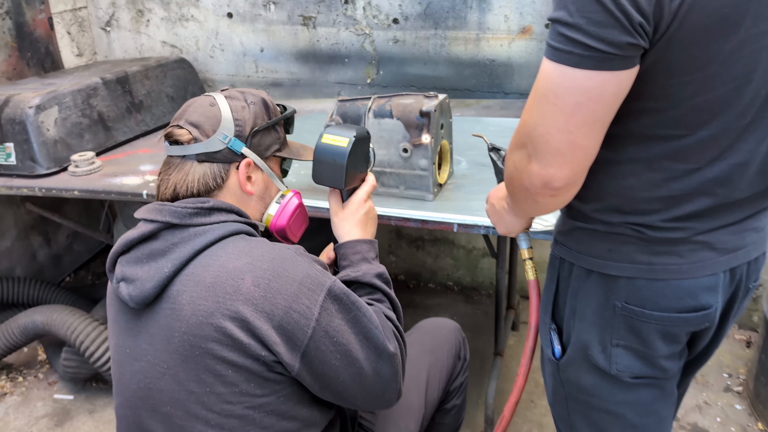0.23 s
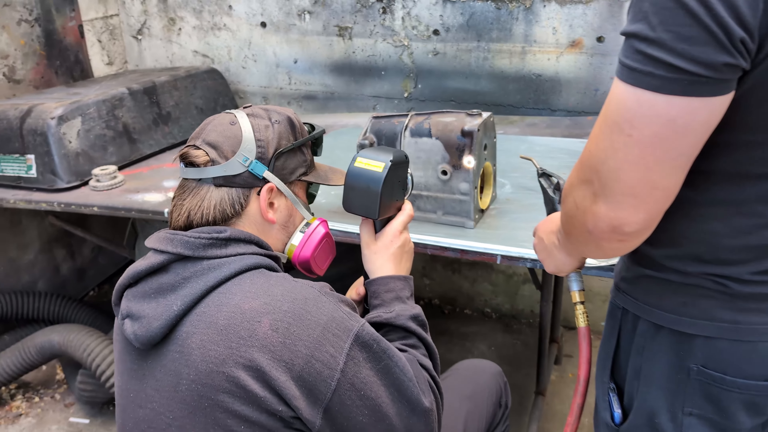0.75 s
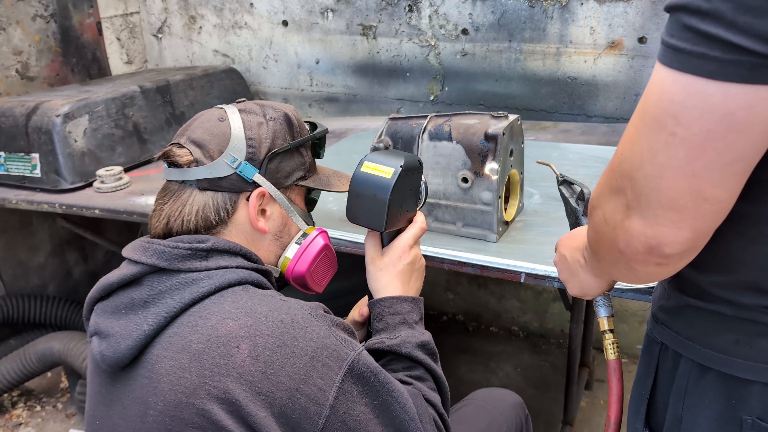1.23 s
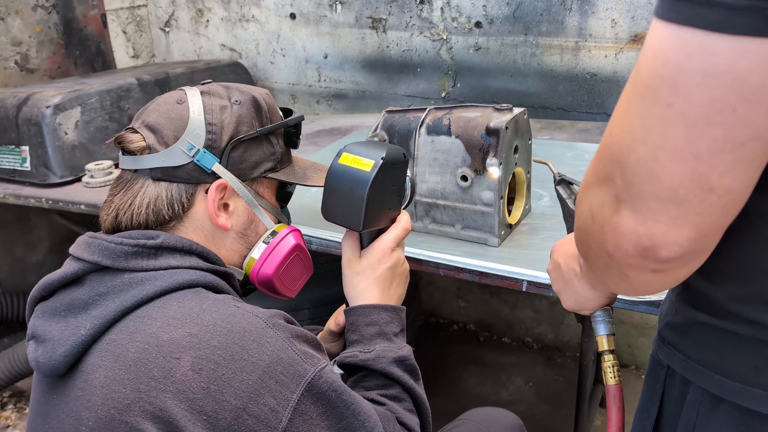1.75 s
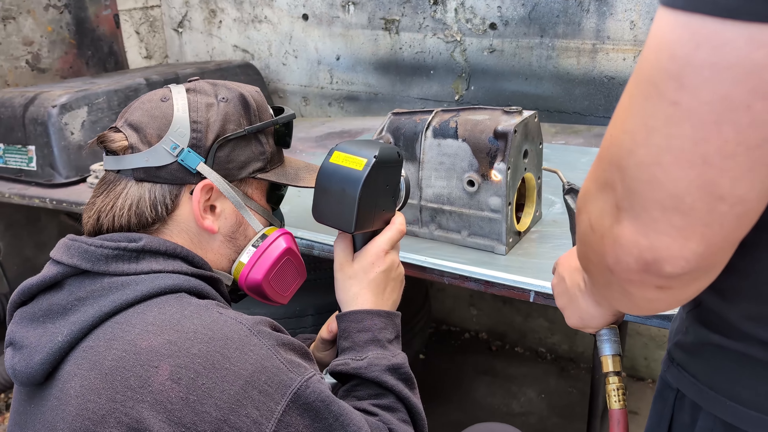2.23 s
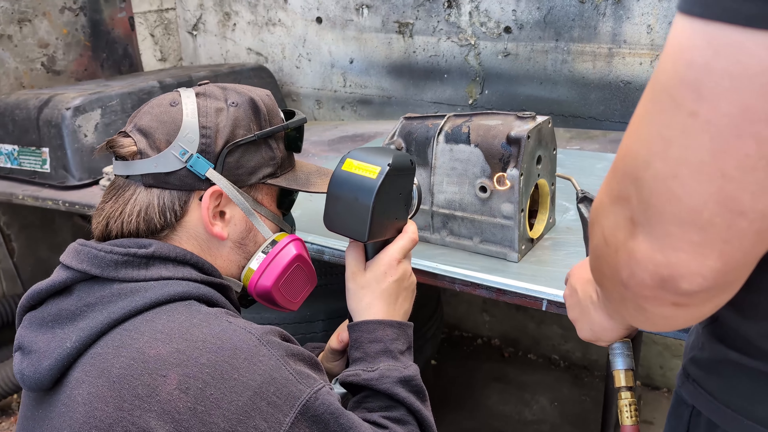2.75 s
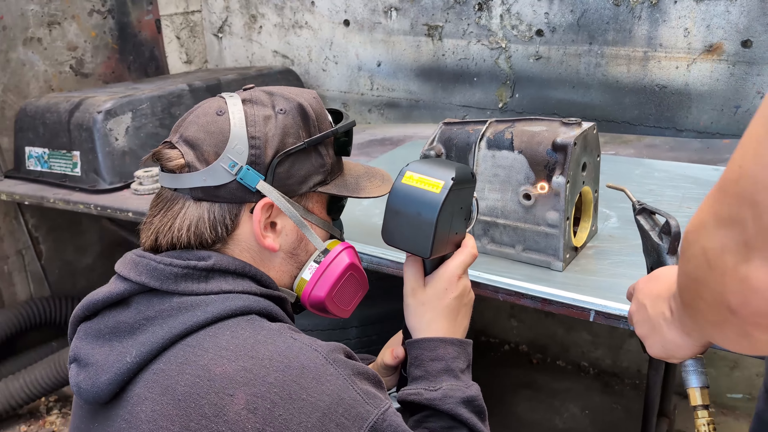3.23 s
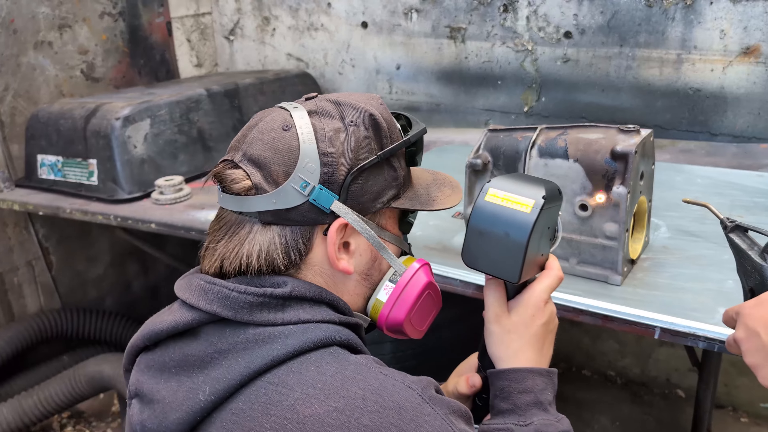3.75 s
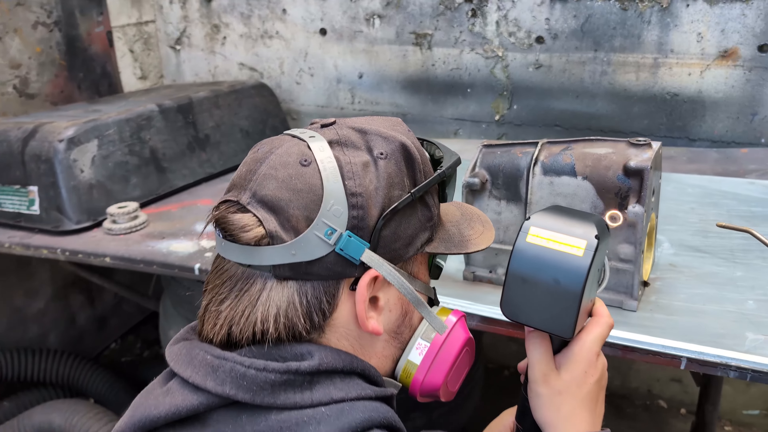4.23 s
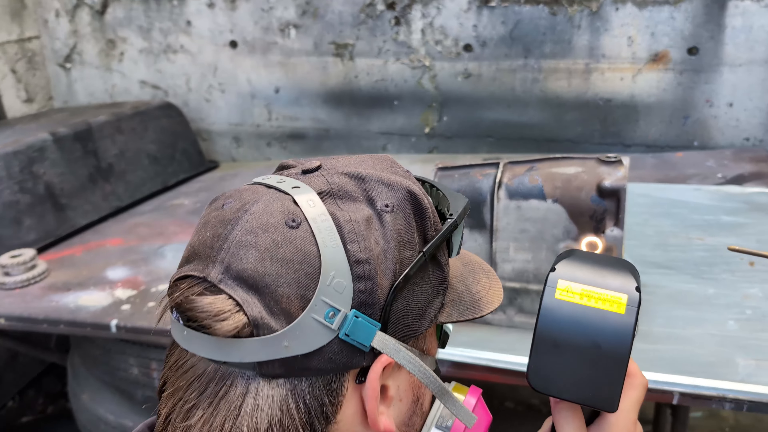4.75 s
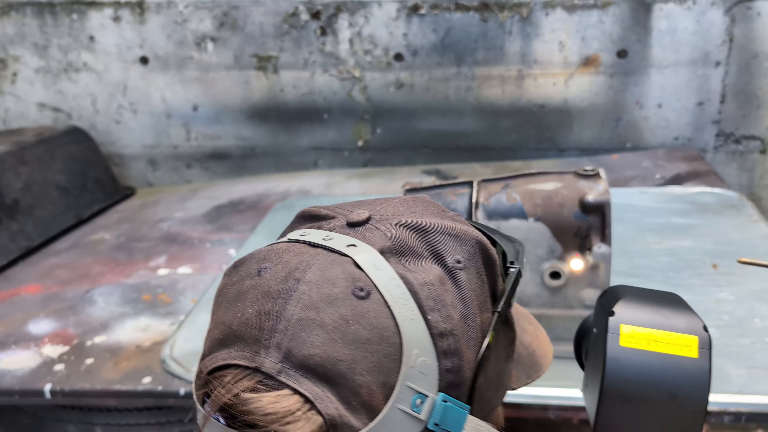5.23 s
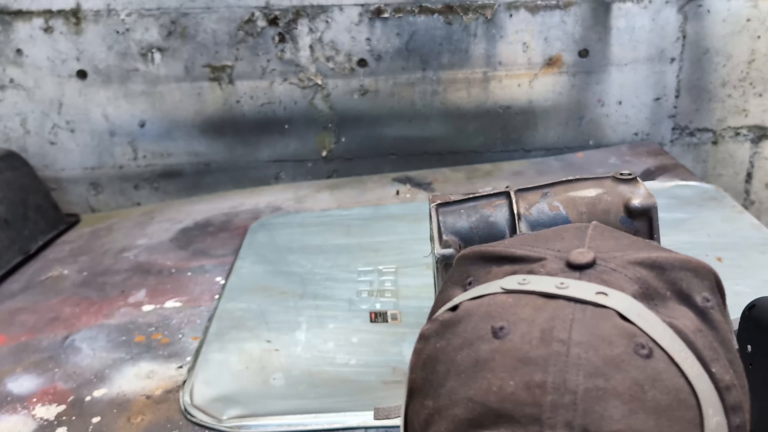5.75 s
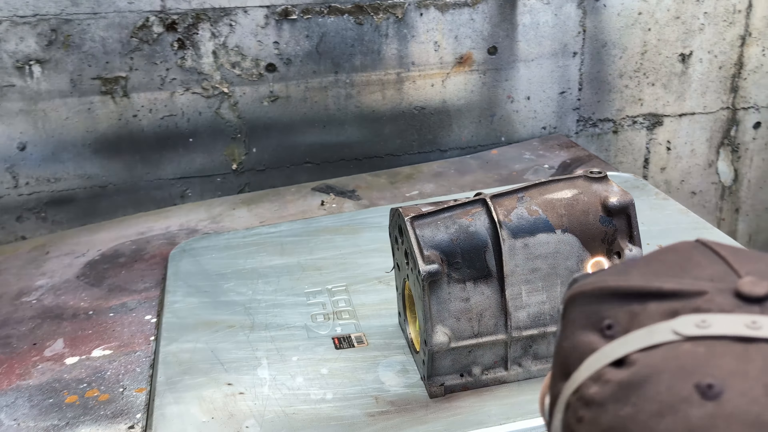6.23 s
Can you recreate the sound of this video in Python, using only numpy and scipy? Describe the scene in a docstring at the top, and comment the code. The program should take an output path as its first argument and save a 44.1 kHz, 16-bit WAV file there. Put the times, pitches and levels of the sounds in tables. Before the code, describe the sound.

A small engine drones steadily under rushing fan noise and grows closer, while a laser sizzles crisply, stripping paint from a metal casting outdoors.

```python
"""An engine drones from the first moment, over the rush of its fan and casing, and grows as the phone drifts closer.
A handheld laser sizzles in the treble as it strips paint from a metal casting in a concrete yard.
The drone, buzz and whine are tones locked to the engine shaft, the rush is coloured noise, and the beam is
tiny random bursts and noise with echoes, flaring where it meets thick coating.
The engine is off to the left, so the right port hears it late."""
import sys
import numpy as np
from scipy import signal
from scipy.fft import rfft, irfft, next_fast_len
from scipy.io import wavfile
from scipy.ndimage import uniform_filter1d, map_coordinates

SR = 44100
rng = np.random.default_rng(int(sys.argv[2]) if len(sys.argv) > 2 else 0)


def voltage_ratio(level):
    """Linear amplitude factor for a level in decibels (scalar or array-like)."""
    return 10 ** (np.asarray(level, float) / 20)


def inscribe(sig):
    """Save sig as 16-bit PCM at rate SR to the path in sys.argv[1].

    A 1-D sig is mono; a 2-D sig holds one channel per row.
    Samples are clipped to [-1, 1] before scaling.
    """
    pcm = np.round(np.clip(np.atleast_2d(sig).T, -1, 1) * 32767)
    wavfile.write(sys.argv[1], SR, pcm.astype(np.int16))


N = 286650
T = np.arange(N) / SR  # seconds
HZ = np.fft.rfftfreq(next_fast_len(N), 1 / SR)
BASS_LAG_SHARE = 0.61  # share of the port delay that the bass feels


def columns(table):
    """Every column after the time, joined by straight lines."""
    s, *rest = np.transpose(table)
    return [np.interp(T, s, c) for c in rest]


def at_hz(table, hz):
    """A spectrum read on a log-frequency axis."""
    f, v = np.transpose(table)
    return np.interp(np.log(hz + 1), np.log(f), v)


def colour(x, gain):
    """Filter by a gain per frequency."""
    return irfft(rfft(x, next_fast_len(N)) * gain, next_fast_len(N))[..., :N]


def level(x, db):
    """Scale to an rms level in dB."""
    return x * voltage_ratio(db) / np.sqrt(np.mean(x ** 2))


def walk(rate):
    """Random levels held 1 / rate s and slewed twice; spread near 1."""
    k = int(SR / rate)
    held = np.repeat(rng.standard_normal(N // k + 1), k)
    return 1.29 * uniform_filter1d(uniform_filter1d(held, k), k)[:N]


def pan(db):
    """Left and right gains for a left minus right difference in dB."""
    return voltage_ratio(np.array([db, -db]) / 2)


# How late engine sound reaches the right port. Each row: time in seconds, delay in ms.
PORT_DELAY = [(0, 0.46), (3.5, 0.51), (4.7, 0.41), (5.3, 0.36), (6.5, 0.35)]


def late(x, share):
    """The right port's copy, delayed by a share of the path difference."""
    delay = share * columns(PORT_DELAY)[0] * SR / 1000
    return map_coordinates(x, [np.arange(N) - delay], order=3, mode="nearest")


# The phone drifts closer to the engine. Each row: time in seconds, gain in dB.
NEARNESS = [(0, -9.5), (.65, -7), (1.3, -4.5), (2.3, -2.5), (3.5, -1.5), (4.5, 0.5), (6.5, 0)]


def approach_db():
    """Gain of the engine in dB as the distance to it shrinks."""
    return columns(NEARNESS)[0]


# Changing balance of cooling air and casing rattle. Each row: time in seconds, low roar lift in dB,
# rattle lift in dB, left minus right in dB (this last column is not played).
RUSH_BALANCE = [(0, -2, -2, 0), (.9, 1.5, -0.5, 2.5), (1.5, -0.5, -1, -1), (2.5, 1.5, 1, 1.5),
                (3.4, 2, 1.5, .5), (4.2, 0.5, 0.5, 1), (4.9, 0.5, 2.5, .5), (5.5, 0.5, 1.5, 2),
                (6.5, 0.5, -1.5, 1)]
# Colour of the rush. Each row: frequency in Hz, relative level per Hz in dB.
RUSH_SPECTRUM = [(30, -5), (50, -5.5), (100, -2), (200, -4), (330, -5), (600, -4), (950, -2), (1150, -3),
                 (1500, -5), (2300, -6.5), (3300, -9.5), (5000, -17), (9000, -24.5), (16000, -45)]
# How alike the two ports hear it. Each row: frequency in Hz, share of the power common to both (0-1).
RUSH_SHARED = [(100, 1), (250, 0.83), (500, 0.52), (1500, 0.53), (3500, 0.28), (6000, 0.13), (12000, 0.026)]


def rush():
    """Broad air noise from fan and casing; part comes straight, the rest off the walls."""
    roar_db, rattle_db, _ = columns(RUSH_BALANCE)
    gain = voltage_ratio(at_hz(RUSH_SPECTRUM, HZ))
    alike = np.clip(at_hz(RUSH_SHARED, HZ), 0, 1)
    # each band: lowest Hz, highest Hz, share of the port delay, lift in dB
    bands = ((20, 400, BASS_LAG_SHARE, roar_db), (395.0, 1050, 0.78, roar_db),
             (1039, 2100, 1, 0.027), (2113, 22000, 1, rattle_db))
    out = 0
    for low_hz, high_hz, lag_share, lift_db in bands:
        band = gain * (HZ >= low_hz) * (HZ < high_hz)
        direct = colour(rng.standard_normal(N), band * np.sqrt(alike))
        walls = colour(rng.standard_normal((2, N)), band * np.sqrt(1 - alike))
        both = np.array([direct, late(direct, lag_share)]) + walls
        out = out + both * voltage_ratio(lift_db + .5 * walk(10))
    # the rush feels only part of the approach
    return level(out, -27) * voltage_ratio(0.72 * approach_db() + .25 * walk(3))


# Engine speed, hunting under its governor. Each row: time in seconds, cycle rate in Hz.
ENGINE_SPEED = [(0, 31.12), (1.1, 31.15), (1.85, 31.47), (2.65, 31.03), (3.15, 31.1), (4.15, 31.34),
                (4.6, 31.03), (5.9, 31.26), (6.5, 31.26)]


def cycle_phase():
    """Phase of the engine cycle in radians, from adding up its speed; order k turns k times as fast."""
    return 2 * np.pi * np.cumsum(columns(ENGINE_SPEED)[0]) / SR


# The phone swings round by the wall, where the bass stands differently.
# Each row: time in seconds, share of the swing done (0-1).
WALL_SWING = [(3.5, 0.04), (4.6, 0.16), (5.3, 0.43), (5.9, 1), (6.5, 1)]
# Exhaust drone, from order 2 up. Each row: order, level in dB at 0 dB approach gain, share of the approach felt,
# change over the whole swing in dB, size of the wavering in dB.
EXHAUST_ORDERS = [(2, -26, 0.69, 2.5, 1), (3, -42.5, 0, -30, 2.5), (4, -20, 1, -1, 0.35),
                  (5, -30, 0.52, 3, -0.5), (6, -43.5, 0.44, 10.5, 4), (7, -40, 0.82, -1, 2),
                  (8, -41, 0.84, -3, -1)]


def exhaust(turn):
    """Firings sound in the silencer as orders locked in phase to the engine cycle."""
    near_db, (swing,) = approach_db(), columns(WALL_SWING)
    orders_db = [db + share * near_db + swing_db * swing + waver_db * walk(2.98)
                 for _, db, share, swing_db, waver_db in EXHAUST_ORDERS]
    # every cycle swells up to its strongest puff: the mirror of the causal phase for this row of levels
    log_gain = np.log(voltage_ratio([-70, -60] + [db.mean() for db in orders_db] + [-46] * 8))
    cepstrum = irfft(log_gain)
    swell = -rfft(np.r_[0, 2 * cepstrum[1:16], np.zeros(16)]).imag
    # the silencer holds higher orders back longer; odd ones, born of unequal firings, trail a little more
    swell -= .28 * np.arange(17) ** 2 + .6 * (np.arange(17) % 2)
    drone = 0
    for k, db in enumerate(orders_db, 2):
        drone = drone + voltage_ratio(db + 0.36 * walk(9)) * np.sqrt(2) * np.cos(k * turn + swell[k])
    return np.array([drone, late(drone, BASS_LAG_SHARE)])


# Casing buzz, the weaker shaft orders. Each row: order, level in dB relative to the others.
BUZZ_ORDERS = [(9, -27.5), (11, -35), (12, -30), (14, -28), (15, -32), (16, -26.5), (17, -31), (18, -29.5),
               (21, -29.5), (22, -25.5), (24, -28), (25, -32), (26, -26), (29, -24.5), (31, -27),
               (32, -25.5), (33, -27), (38, -27), (40, -23), (42, -24), (48, -25.5), (52, -30), (54, -30.5),
               (58, -44), (60, -29.5), (64, -33), (67, -36), (70, -30.5), (78, -38), (84, -38)]


def casing_buzz(turn):
    """Weak orders of the casing waver as wall echoes shift around the phone."""
    direct, echo = 0, np.zeros((2, N))
    for k, db in BUZZ_ORDERS:
        phase = k * turn + 2 * np.pi * rng.random() + 1.06 * walk(1.516)
        direct = direct + voltage_ratio(db + 2.3 * walk(5)) * np.cos(phase)
        for port in range(2):
            echo[port] += voltage_ratio(db - 5.0) * walk(3.94) * np.cos(k * turn + 2 * np.pi * rng.random())
    return voltage_ratio(-16 + approach_db()) * (np.array([direct, late(direct, 0.97)]) + echo)


# Casing tones that come and go. Each row: order, resting level in dB at 0 dB approach gain, half the phase between
# the ports in radians, and its swells, each: middle in seconds, half length in seconds, peak in dB.
CASING_TONES = [(10, -55, .47, [(5.3, .4, -41), (6.2, 0.27, -38.5)]),
                (12.99, -46.5, 0.53, [(3.5, 0.4, -38.5), (4.35, 0.38, -40.5), (5.55, 0.22, -37.5),
                (6.0, 0.13, -36.5)]), (19.04, -42.5, 1.0, [(1.8, 0.33, -36), (4.05, .2, -35)]),
                (19.93, -47, .84, [(.75, 0.24, -36.5), (3.3, .2, -39), (3.8, .2, -37), (4.5, .2, -39),
                (6.05, 0.16, -42)]), (27.02, -46, 1, [(1.9, .4, -43), (2.8, 0.48, -36.5), (4.0, 0.18, -40),
                (5.4, 0.47, -35)]), (28.1, -44, 0.99, [(3.9, 0.26, -37)]),
                (34.17, -50, 0.96, [(5.2, .6, -38)]), (75.1, -57, .3, [(4.95, .3, -38)])]


def casing_tones(turn):
    """Single tones of the casing swell out of a wavering resting level."""
    near_db, out = approach_db(), np.zeros((2, N))
    for k, db, side_rad, swells in CASING_TONES:
        size = voltage_ratio(db + near_db + 4.1 * walk(3.1))
        for s, half, peak_db in swells:
            size = size + voltage_ratio(peak_db) * np.exp(-((T - s) / half) ** 2)
        start = 2 * np.pi * rng.random()
        phase = k * turn + start + side_rad * np.array([[1], [-1]])
        out += size * voltage_ratio(1.7 * walk(8)) * np.cos(phase)
    return out


# Fan whine. Each row: time in seconds, level in dB, left minus right in dB.
FAN_WHINE = [(0.0, -46.5, -1), (0.45, -49, 9), (1.15, -42.5, -1), (2.26, -36.5, 3), (2.82, -46, 10),
             (2.96, -39, 8), (3.59, -38, -4), (3.9, -45, -3), (4.35, -35.5, 4), (4.81, -42.5, 14),
             (5.12, -39.5, 15), (6.45, -52, 2)]


def fan_whine(turn):
    """Thirty blade passes a cycle make a thin tone that flutters a little."""
    whine_db, pan_db = columns(FAN_WHINE)
    side_rad = 0.91  # half the phase between the ports
    flutter = voltage_ratio(1.1 * walk(14))
    whine = np.array([flutter * np.cos(30 * turn + side * side_rad + 0.17 * walk(3.25)) for side in (1, -1)])
    return whine * voltage_ratio(whine_db) * np.sqrt(2) / np.cos(side_rad) * pan(pan_db)


def engine():
    """Exhaust, casing and fan all follow the same turning shaft."""
    turn = cycle_phase()
    return exhaust(turn) + casing_buzz(turn) + casing_tones(turn) + fan_whine(turn)


# Flares on thick coating. Each row: start in seconds, length in seconds, lift in dB.
THICK_COATING = [(.875, .07, 2.5), (1.198, .086, 4), (1.485, .085, 4.5), (1.739, 0.08, 6),
                 (2.127, .09, 5.5), (2.656, .18, 2), (2.992, 0.11, 6.5), (3.439, .097, 7),
                 (3.883, .115, 4.5), (4.624, .139, 3), (5.035, .125, 2), (5.31, .101, 4.5),
                 (5.696, 0.091, 4), (6.041, 0.082, 4.5)]


def flares():
    """Each flare lifts the beam with soft edges, in dB."""
    edge_s, lift = 0.048, 0  # rise and fall in seconds
    for s, length, db in THICK_COATING:
        lift = lift + db * np.clip(np.minimum(T - s, s + length - T) / edge_s + .5, 0, 1)
    return lift


# Beam on the coating between flares. Each row: time in seconds, level in dB,
# relative level of its lower sizzle in dB.
BEAM_LEVEL = [(0, -39.5, 5), (.5, -34, 1), (1.1, -34, 2), (1.7, -33.5, 2), (2.0, -31.5, 1.5),
              (2.45, -30.5, 1.5), (2.63, -32, 2.5), (3.42, -30.5, 2.5), (3.52, -25.5, 0.5), (3.85, -27, -1),
              (4.18, -27, -2), (4.25, -25.5, -2), (4.55, -24.5, -3.5), (4.85, -26.5, -2),
              (5.28, -28.5, 1.5), (5.45, -25, -0.5), (6.0, -25.5, -1.5), (6.5, -26, 2)]
# Where the gun points. Each row: time in seconds, relative level of the airy top in dB,
# left minus right in dB, the same for the airy top in dB.
GUN_AIM = [(0, 0, 1, -1.5), (1.05, -1.5, .5, -2), (2.5, -1.5, 3, 3), (3.15, -1.5, 3, 1),
           (3.64, 0.5, -1, -3), (4.16, -2.5, -1, -7), (4.69, 0, -1, -5.5), (5.25, 1.5, 0, -1.5),
           (5.7, -1, -0.5, -5), (6.5, 1, 3.5, 2)]
# Colour of the sizzle. Each row: frequency in Hz, relative level per Hz in dB.
BEAM_SPECTRUM = [(2500, -12.5), (4200, -7.5), (5800, -3), (8600, -4), (9400, -1), (10500, 0.5), (11300, 4),
                 (12200, 2.5), (13300, 1.5), (14500, 1.5), (15500, -1), (17000, -6)]
# Paths to the two ports. Each row: left delay in ms, right delay in ms, gain in dB.
BEAM_ECHOES = [(.2, 0.2525, -1.5), (1.1, 1.6, -11), (2.3, 1.7, -6.5), (3.3, 4.1, -12), (6.2, 6.1, -7.5),
               (7.9, 9.4, -7)]


def beam():
    """Thousands of tiny bursts a second as the coating flashes off; casting and table send shifting echoes."""
    (db, body_db), lift_db = columns(BEAM_LEVEL), flares()
    air_db, pan_db, air_pan_db = columns(GUN_AIM)
    hit = rng.random(N) < 9000 / SR  # bursts per second
    burst_size = voltage_ratio(2.8 * np.minimum(rng.exponential(size=N), 5))
    sparks = hit * burst_size * rng.standard_normal(N)
    hiss = level(rng.standard_normal(N), -1.8)
    source = (level(sparks, 2.2) + hiss) * voltage_ratio(.5 * walk(24.95))
    sizzle = level(rng.standard_normal((2, N)), 3.2)  # unlike at the two ports
    for left_ms, right_ms, path_db in BEAM_ECHOES:
        for port, ms in enumerate((left_ms, right_ms)):
            moved = np.arange(N) - (ms + 0.049 * walk(4)) * SR / 1000
            sizzle[port] += voltage_ratio(path_db) * map_coordinates(source, [moved], order=3, mode="nearest")
    sizzle *= voltage_ratio(0.25 * walk(300) + 0.35 * walk(60))  # the plume sputters
    # three bands, crossing near 8800 and 12300 Hz
    gain = voltage_ratio(at_hz(BEAM_SPECTRUM, HZ))
    top = 1 / (1 + (8800 / (HZ + 1)) ** 12)
    thin = 1 / (1 + (12300 / (HZ + 1)) ** 16)
    # the lower sizzle gives way very slightly in a flare
    body = colour(sizzle, gain * (1 - top)) * voltage_ratio(body_db - 0.08 * lift_db)
    middle = colour(sizzle, gain * top * (1 - thin))
    air = colour(sizzle, gain * top * thin) * voltage_ratio(air_db) * pan(air_pan_db - pan_db)
    return level(middle + body + air, 0) * voltage_ratio(db + lift_db + .5 * walk(12)) * pan(pan_db)


def scene():
    """Cooling air, engine and beam at the two ports."""
    return rush() + engine() + beam()


def band_limit(x):
    """A steep low-pass at the top of the band."""
    return signal.sosfilt(signal.butter(12, 15870, fs=SR, output="sos"), x)


def record(dry):
    """The phone cuts deepest bass and top; its gain control ducks everything while treble passes a limit."""
    limit_db, slope = -22.5, 0.92  # slope: dB of ducking per dB over the limit
    treble = signal.sosfilt(signal.butter(2, 5000, "high", fs=SR, output="sos"), dry)
    treble_power = uniform_filter1d(np.mean(treble ** 2, axis=0), SR // 40)
    treble_db = 10 * np.log10(treble_power + 1e-12)
    over_db = uniform_filter1d(np.maximum(treble_db - limit_db, 0), SR // 60)
    ducked = dry * voltage_ratio(-slope * over_db)
    bass_cut = signal.butter(2, 45, "high", fs=SR, output="sos")
    top_cut = signal.ellip(10, .2, 70, 15900, fs=SR, output="sos")
    return band_limit(signal.sosfilt(np.r_[bass_cut, top_cut], ducked))


dry = scene()
out = record(dry)
inscribe(out)
```